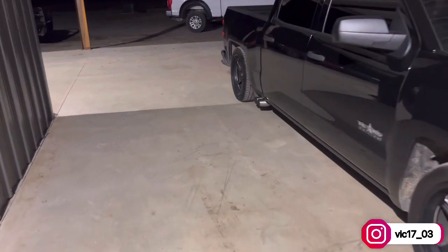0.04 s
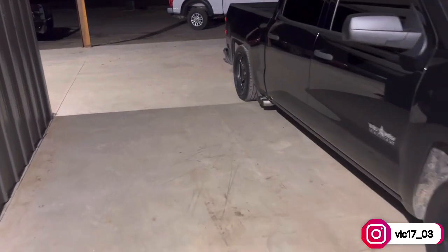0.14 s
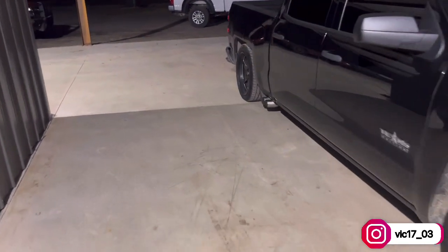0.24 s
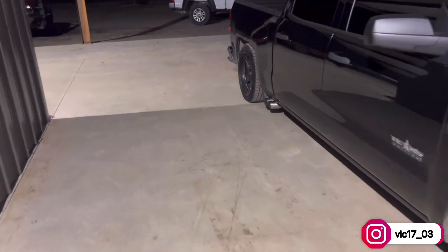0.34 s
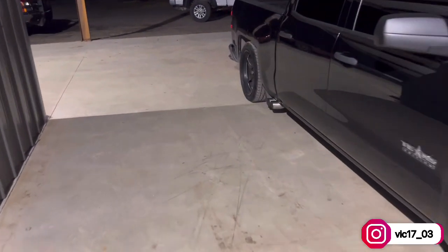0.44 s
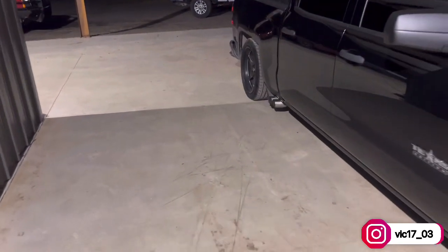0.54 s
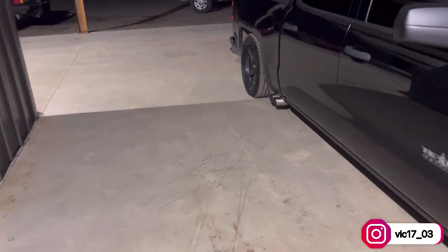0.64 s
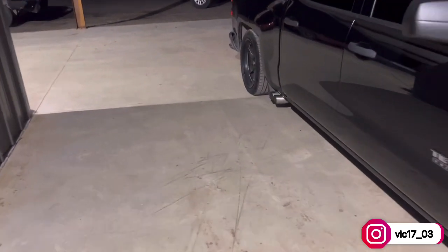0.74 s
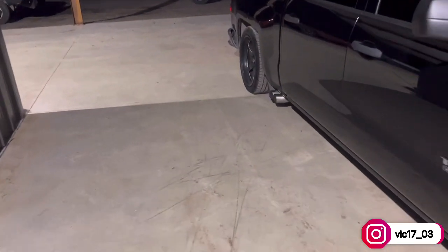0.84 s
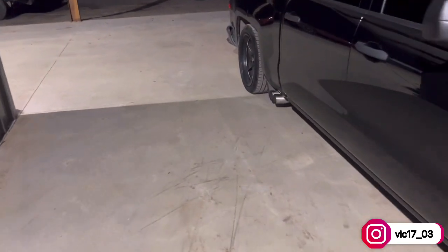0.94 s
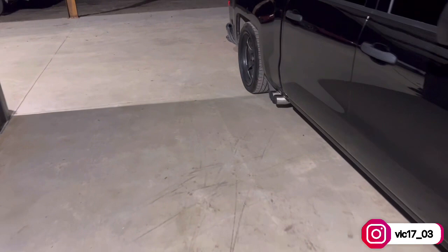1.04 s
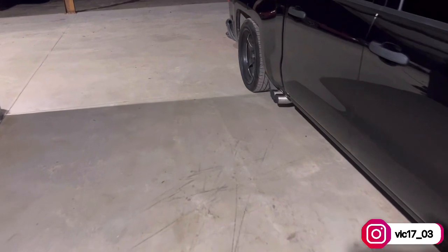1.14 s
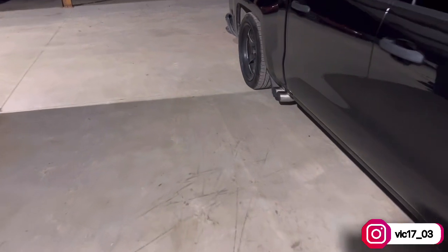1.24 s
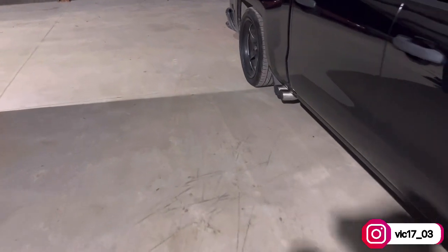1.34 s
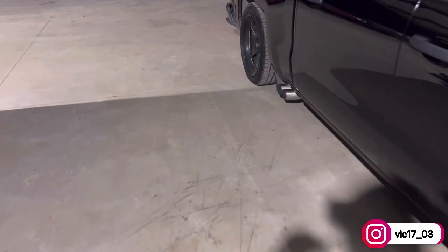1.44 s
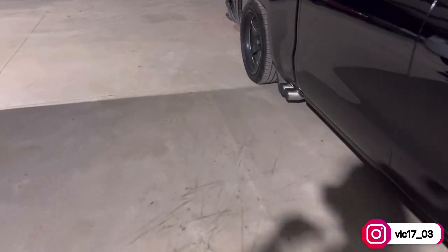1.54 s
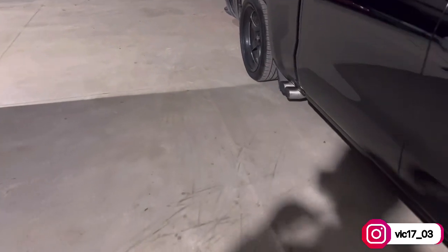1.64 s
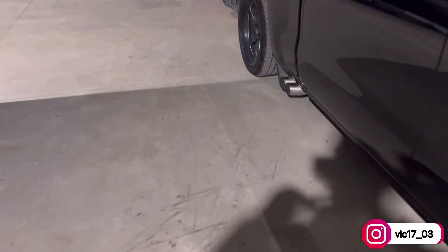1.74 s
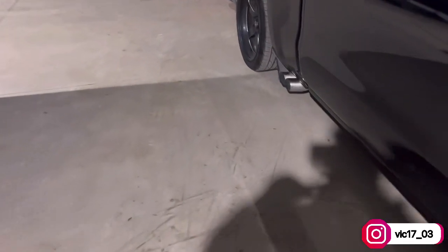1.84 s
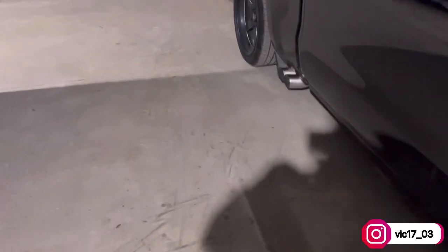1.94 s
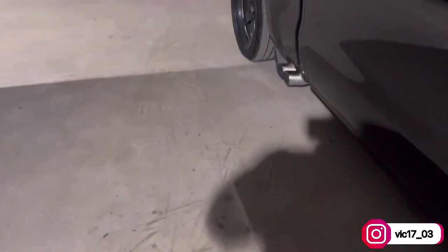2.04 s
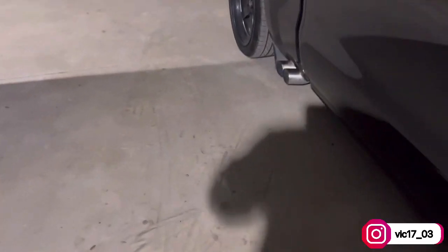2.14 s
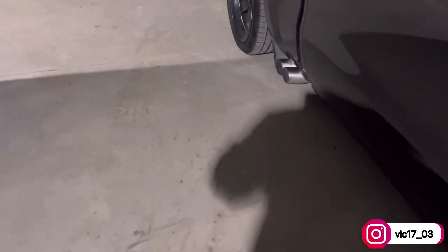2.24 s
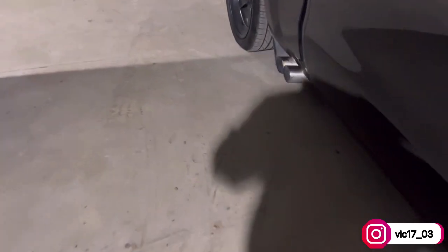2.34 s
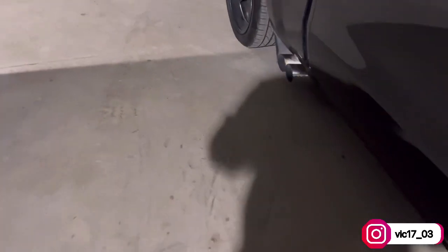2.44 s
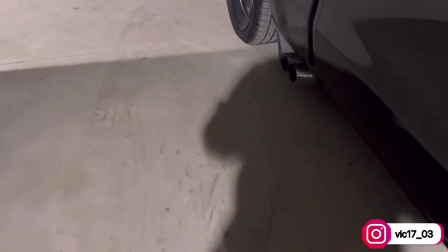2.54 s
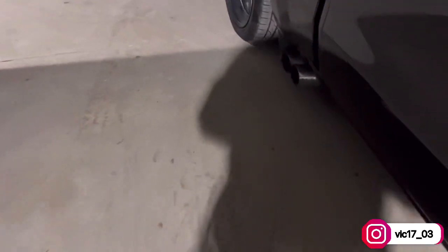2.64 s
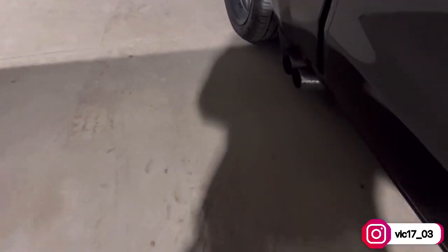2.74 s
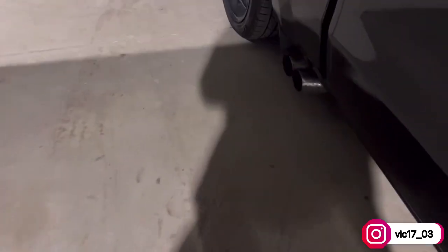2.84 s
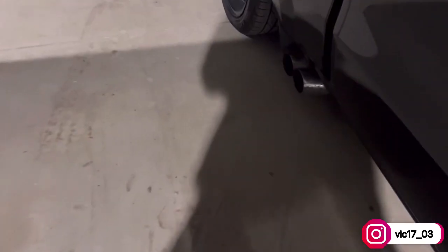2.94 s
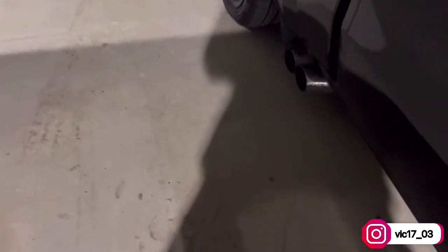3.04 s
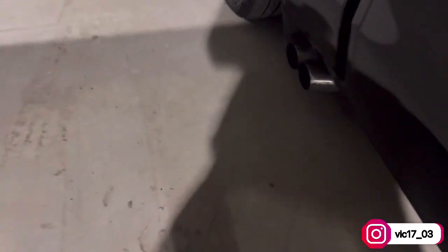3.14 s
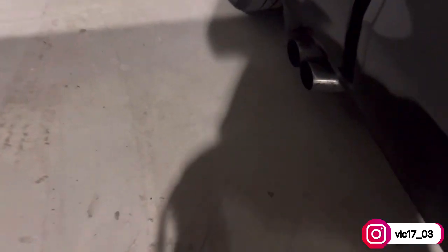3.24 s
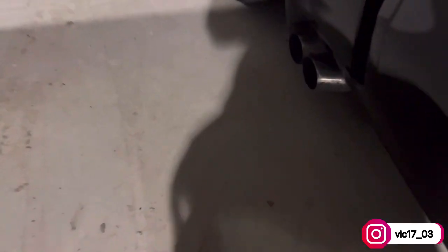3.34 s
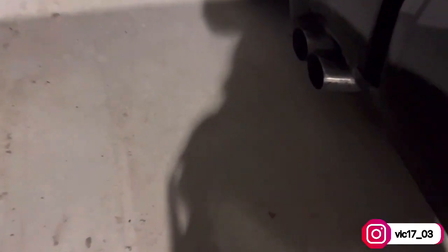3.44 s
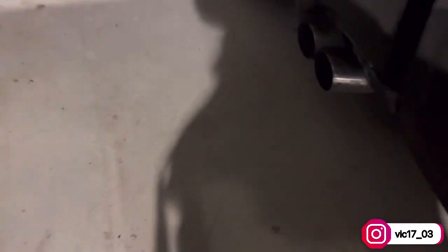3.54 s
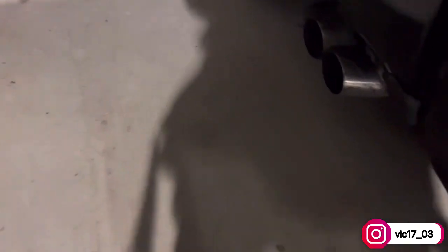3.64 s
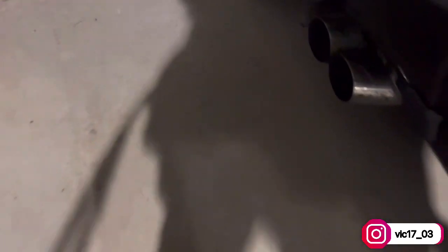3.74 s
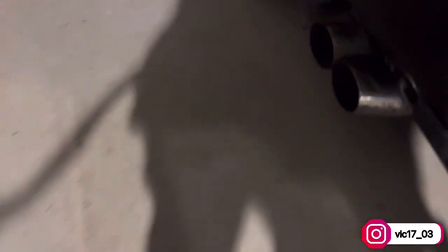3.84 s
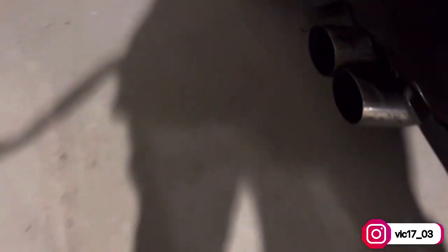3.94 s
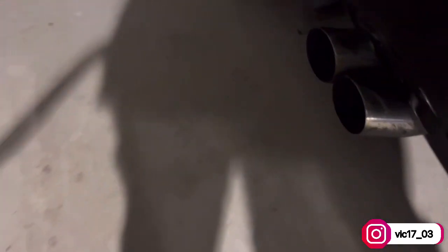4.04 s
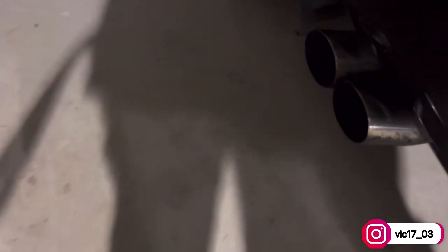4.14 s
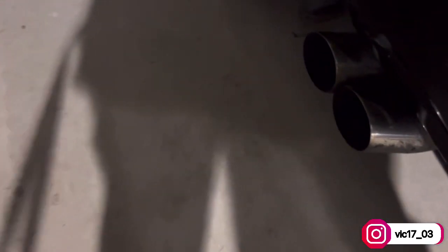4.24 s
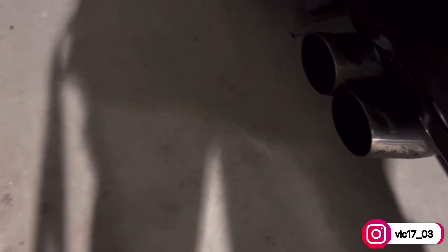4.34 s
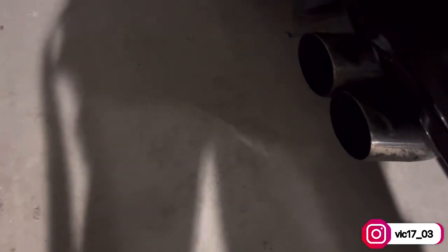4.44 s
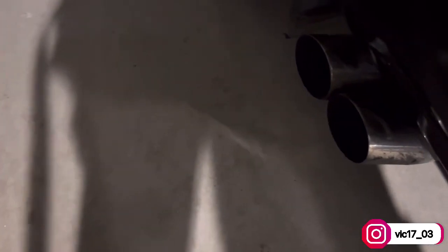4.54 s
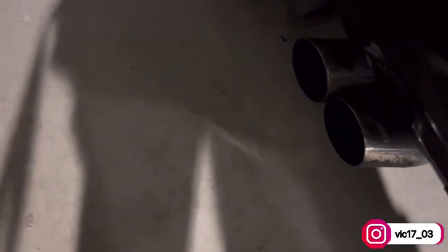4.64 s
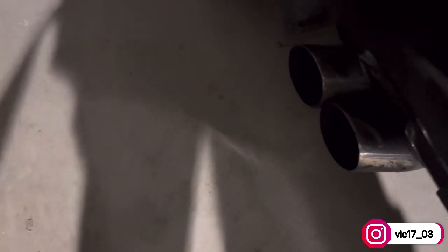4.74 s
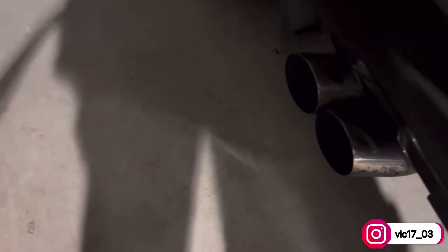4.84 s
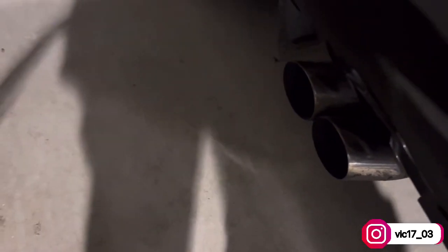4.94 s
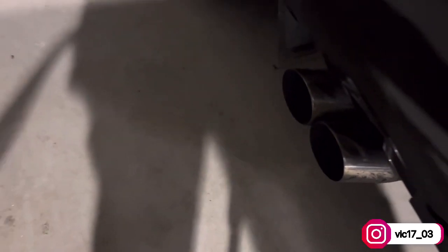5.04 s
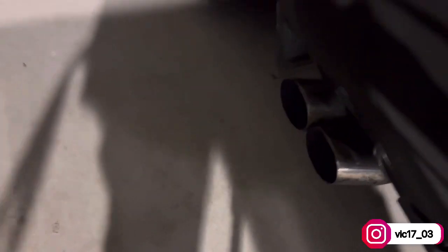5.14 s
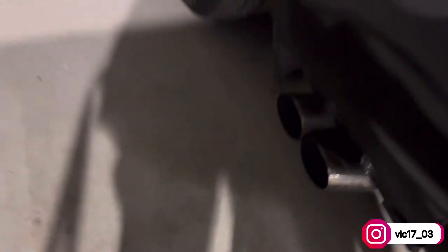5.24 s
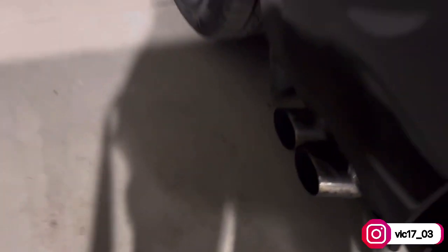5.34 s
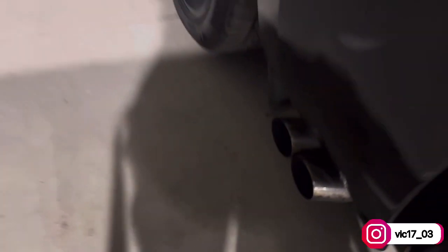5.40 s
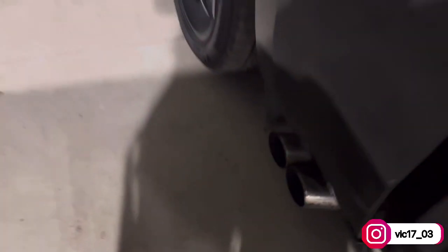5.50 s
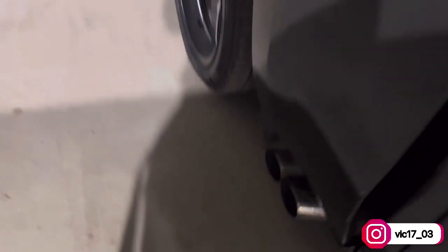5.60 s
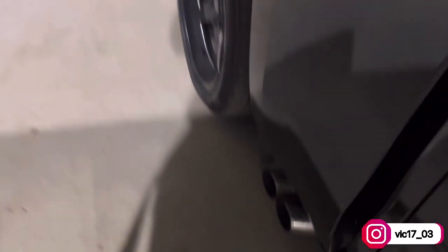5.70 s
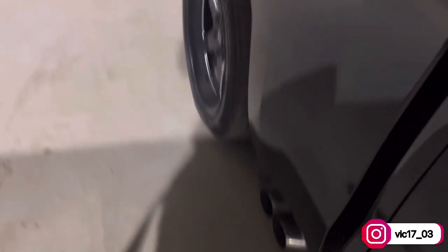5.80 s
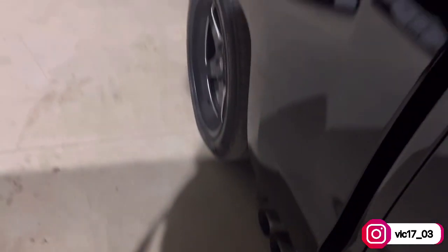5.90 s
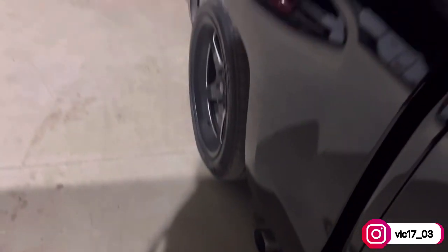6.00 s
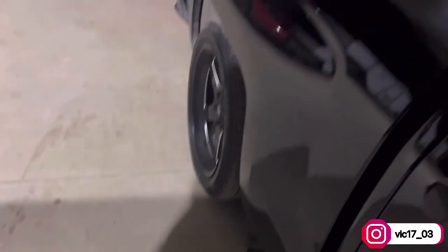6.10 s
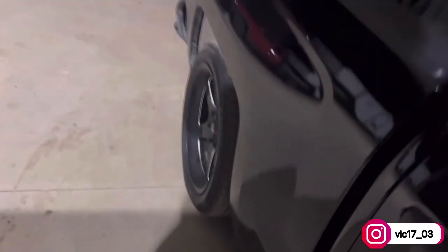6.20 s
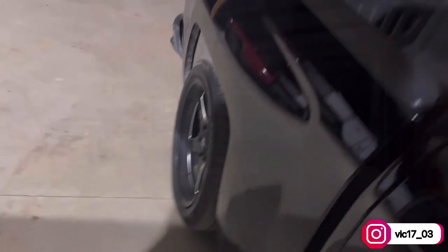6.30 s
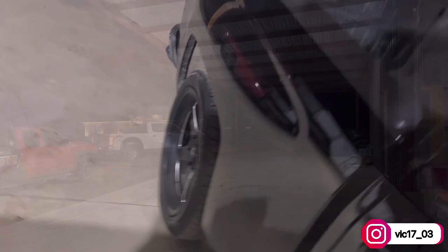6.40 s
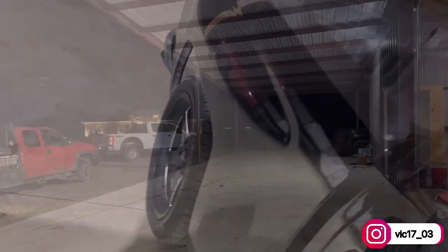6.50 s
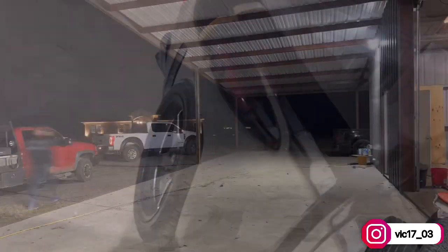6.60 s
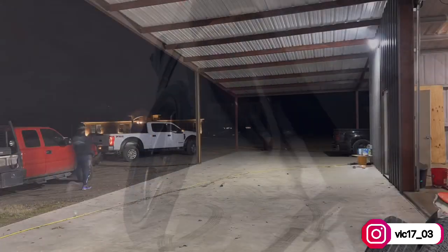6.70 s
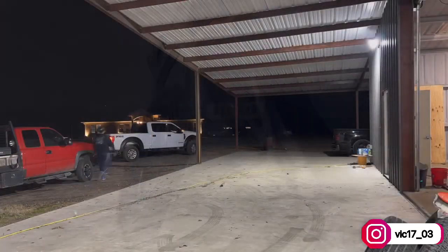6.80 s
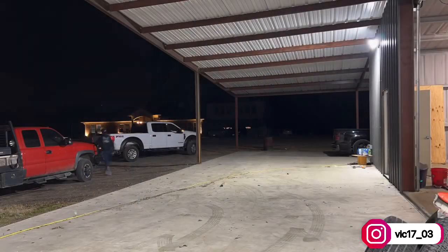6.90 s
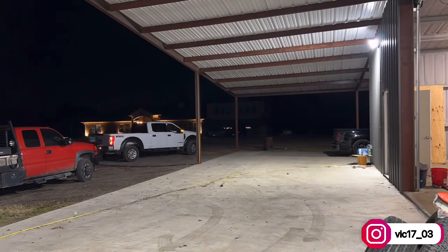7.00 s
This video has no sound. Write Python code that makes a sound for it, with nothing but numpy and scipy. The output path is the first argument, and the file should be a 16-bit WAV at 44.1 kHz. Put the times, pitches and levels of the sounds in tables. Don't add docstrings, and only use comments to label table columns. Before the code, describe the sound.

A V8 pickup with open side pipes idles in a deep, uneven lope under a metal carport, growing hissier and raspier close to the tips.

```python
import sys
import numpy as np
from scipy import signal
from scipy.fft import rfft, irfft, next_fast_len
from scipy.io import wavfile
from scipy.ndimage import uniform_filter1d, minimum_filter1d

SR = 44100
rng = np.random.default_rng(int(sys.argv[2]) if len(sys.argv) > 2 else 0)


def bounce(signal):
    frames = np.transpose(np.atleast_2d(signal))
    limited = np.clip(frames, -1, 1)
    pcm = np.round(limited * 32767).astype(np.int16)
    wavfile.write(sys.argv[1], SR, pcm)


def how_loud(loudness_db):
    steps = np.asarray(loudness_db, float) / 20
    return 10 ** steps


N = 311346


def unit(x):
    return x / np.sqrt(np.mean(x ** 2) + 1e-20)


def along(points, hz):
    f, value = np.transpose(points)
    return np.interp(np.log(hz + 1), np.log(f + 1), value)


def curve(rows):
    return np.interp(np.arange(N) / SR, *np.transpose(rows))


def filtered(x, response):
    m = next_fast_len(N + SR // 2)
    spectrum = rfft(x, m) * response(np.fft.rfftfreq(m, 1 / SR))
    return irfft(spectrum, m)[..., :N]


def levelled(x, seconds):
    power = uniform_filter1d(np.mean(x.reshape(-1, N) ** 2, 0), int(seconds * SR))
    return x / np.sqrt(np.abs(power) + 1e-12)


def patches(db, wide, long):
    z = signal.stft(rng.standard_normal((2, N)), nperseg=512)[2]
    field = uniform_filter1d(rng.standard_normal(z.shape[1:]), int(wide), 0)
    field = uniform_filter1d(field, int(long), 1)
    return signal.istft(z * how_loud(db * unit(field)), nperseg=512)[1][:, :N]


# (frequency [Hz], correlation [0-1])
ALIKE = [(60, 1), (250, .95), (500, .78), (1000, .84), (2000, .82), (4000, .8), (8000, .87), (12000, .92)]
# (frequency [Hz], width [Hz], level [dB])
PANELS = [(62.4, 37, 13), (197, 3.4, -8.5), (284.5, 7.2, 10.5), (313, 4.5, 5), (360, 20, 8.5),
          (392, 60, 6.5), (486.6, 33, 7.5), (767, 66, 5), (944, 50, 5), (1090, 9.9, 6), (1620, 24, 4.5),
          (1800, 73, 4.5), (2620, 42, 3.5), (3800, 42, 6), (4230, 70, 2.5), (4760, 14, -5.5),
          (6840, 120, 1.5), (7700, 1300, 4), (8400, 870, 2.5)]


def rush(spectrum, gas, comb=lambda hz: 1):
    f = np.arange(SR // 2 + 1.)
    turn = np.arccos(np.clip(along(ALIKE, f), -1, 1)) / 2
    ring = 1
    for hz, width, db in PANELS:
        ring = ring + (how_loud(db) - 1) * 1j * f * width / (hz * hz - f * f + 1j * f * width)
    colour = how_loud(along(spectrum, f)) * comb(f) * ring * [np.cos(turn), np.sin(turn)]
    mid, side = filtered(gas, lambda hz: np.array([np.interp(hz, f, c) for c in colour]))
    return unit(np.array([mid + side, mid - side]))


# (time [s], crank speed [rpm])
SPEED = [(0, 751.02), (1.2596, 747.21), (1.6096, 733.49), (2.5658, 746.5), (3.7472, 744.68),
         (4.5081, 723.71), (5.5131, 751.21), (6.2453, 732.38), (7.2, 732.92)]


def cycles():
    rate, first_cycle_s = 2000, .0027
    t = np.arange(0, SPEED[-1][0], 1 / rate)
    turn = np.cumsum(np.interp(t, *np.transpose(SPEED))) / rate / 120
    turn = turn - first_cycle_s * SPEED[0][1] / 120
    return np.interp(np.arange(int(turn[-1]) + 1), turn, t + 1 / rate)


# (crank position [eighths of a cycle], pulse level [dB])
CYLINDERS = [
    (0.247, 13.9),
    (1.199, 10.6),
    (2.382, 3.5),
    (3.256, 1.5),
    (4.246, 2.1),
    (5.257, 5.4),
    (6.258, 9.5),
    (7.241, 7.2),
]
BANK = [0, 1, 2, 0, 1, 0, 0, 1]


def firings(late, jitter_s, scatter_db):
    starts = cycles()
    starts = np.r_[3 * starts[0] - 2 * starts[1], 2 * starts[0] - starts[1], starts]
    turn = np.arange(len(starts) - 1)[:, None] + (np.transpose(CYLINDERS)[0] + late) / len(BANK)
    luck = rng.standard_normal((turn.size, 2))
    s = np.interp(turn.ravel(), np.arange(len(starts)), starts, left=-1) + jitter_s * luck[:, 0]
    cylinder = np.arange(turn.size) % len(BANK)
    return np.round(s * SR).astype(int), cylinder, how_loud(scatter_db * luck[:, 1])


def impulses(at, strength):
    inside = (at >= 0) & (at < N)
    return np.bincount(at[inside], strength[inside], N)


# (frequency [Hz], density [dB per Hz])
BAY = [(420, -39.5), (540, -8), (620, -3.5), (700, 0.5), (900, -42.5)]


def bay():
    level_db, fade_db_per_s = -51.5, 2.5
    fade = how_loud(level_db - fade_db_per_s * np.arange(N) / SR)
    return fade * rush([(200, -120), *BAY, (2000, -120)], patches(2.1, 1.7, 5.8))


def echoes(still, uneven):
    at, cylinder, luck = firings(0, jitter_s=.0001, scatter_db=1)
    pulses = impulses(at, luck * how_loud(np.transpose(CYLINDERS)[1] * uneven)[cylinder])
    bins, kept = 4097, 600
    z = signal.stft(pulses, nperseg=8192, noverlap=6144)[2][:kept]
    paths = uniform_filter1d(rng.standard_normal((2, 2, *z.shape)), size=4, axis=2)
    paths = uniform_filter1d(paths, still, 3)
    z = np.pad(z * (paths[0] + 1j * paths[1]), ((0, 0), (0, bins - len(z)), (0, 0)))
    return unit(signal.istft(z, nperseg=8192, noverlap=6144)[1][:, :N]) * np.sqrt(kept / bins)


# (time [s], level [dB])
SPIT = [(0, -73.5), (2.4, -63.5), (4.2, -59.5), (6.1, -68.5), (6.5, -89.5), (7.06, -85)]


def ticks():
    ring_hz, t60_s, rise_s = 4750, .02, .0015
    at, cylinder, luck = firings(-.2, jitter_s=.0008, scatter_db=4.5)
    t = np.arange(SR // 25) / SR
    partials = np.sin(2 * np.pi * ring_hz * t) + 2.0 * np.sin(2 * np.pi * .87 * ring_hz * t)
    ping = how_loud(-60 * t / t60_s) * (1 - np.exp(-t / rise_s)) * partials
    return how_loud(curve(SPIT)) * unit(signal.fftconvolve(impulses(at, luck), ping)[:N])


def struck(rows, t60_s, rise_s, ring_db, crack_db, low_hz, high_hz):
    out, t = np.zeros((2, N + SR)), np.arange(SR // 20) / SR
    shape = how_loud(-60 * t / t60_s) * (1 - np.exp(-t / rise_s))
    shape = shape / shape.max()
    for s, db, hz in rows:
        noise = rng.standard_normal((3, len(t)))
        burst = how_loud(crack_db) * (noise[0] + .3 * noise[1:])
        ring = how_loud(ring_db) * np.sin(2 * np.pi * hz * t)
        out[:, round(s * SR):][:, :len(t)] += how_loud(db) * shape * (ring + burst)
    return filtered(out[:, :N], lambda f: 1 / (1 + (low_hz / (f + 1)) ** 6) / (1 + (f / high_hz) ** 30))


# (time [s], peak level [dB], ring frequency [Hz])
SPITS = [(0.165, -39, 4070), (1.4521, -36, 3640), (1.899, -44, 3700), (2.0794, -37, 4600),
         (2.582, -34, 4190), (3.4322, -30, 3930), (3.534, -25, 3900), (3.5683, -27, 4280),
         (3.6326, -31, 3830), (3.8118, -41, 3690), (3.8305, -38, 3680), (3.9744, -35, 4760),
         (4.0532, -29, 3970), (4.138, -30, 4740), (4.1769, -37, 4010), (4.1969, -26, 4800),
         (4.2582, -25, 3900), (4.3198, -38, 3430), (4.3415, -36, 4150), (4.3814, -32, 4630),
         (4.4039, -26, 3740), (4.4468, -34, 4600), (4.5062, -37, 4250), (4.5262, -26, 4200),
         (4.5466, -37, 3600), (4.6488, -35, 4700), (4.691, -32, 4270), (4.733, -33, 4960),
         (4.7975, -36, 4230), (4.814, -43, 4870), (4.939, -43, 3330), (4.9991, -39, 4000),
         (5.0603, -43, 4470), (5.1402, -40, 4540), (5.1627, -41, 4220), (5.2016, -38, 4230),
         (5.3009, -34, 4570), (5.6211, -43, 4650), (5.6816, -33, 4700), (5.8661, -34, 4800),
         (5.9434, -34, 4640)]


def spits():
    return struck(SPITS, t60_s=0.017, rise_s=0.001, ring_db=-11, crack_db=-9, low_hz=3200, high_hz=5200)


# (time [s], peak level [dB], ring frequency [Hz])
POPS = [(0.517, -29, 910), (1.151, -29, 860), (1.37, -24, 784), (1.47, -27, 800), (1.631, -22, 766),
        (2.766, -26.5, 840), (3.206, -34, 810), (3.387, -35, 770), (3.629, -37, 1070), (3.658, -35, 990),
        (4.012, -39, 1130), (4.033, -17, 746), (4.176, -18, 1140), (4.211, -33, 1173), (4.291, -17, 975),
        (4.578, -15, 950), (4.643, -20.5, 980), (4.69, -21, 950), (4.728, -27.5, 773), (4.77, -16, 853),
        (4.912, -31, 1050), (5.095, -22, 860), (5.201, -31.5, 790), (5.611, -22.5, 970), (6.199, -30, 780)]


def pops():
    return struck(POPS, t60_s=0.072, rise_s=0.0016, ring_db=-8.0, crack_db=-5.0, low_hz=704, high_hz=1800)


# (time [s], jet level [dB], boom level [dB])
ODD_CYCLES = [(.02, -4, -2.5), (0.339, -2, 0.5), (.96, 2, 0.5), (1.14, -2.5, -2), (1.45, -1, 0.5),
              (1.643, 5, -1.5), (1.797, -5, 0), (1.948, 2, -1), (2.09, 1, -0.5), (2.44, -1.5, -2),
              (2.6, 1, -1.5), (2.772, 3.5, -1), (2.92, -1, -1), (3.09, 0.5, -1), (3.49, -4, 3),
              (3.55, -1, 0.5), (4.04, 4.5, -1), (4.7, 2.5, 1), (5.041, 2.5, -1.5), (5.37, 2.5, -1.5),
              (5.5, -6, 0), (5.688, 5, 0), (6.15, 3, 1.5), (6.959, 4.5, -2)]


def chuffs():
    depth_db, place, half_width_s = 3.8, .1, .033
    t, starts = np.arange(N) / SR, cycles()
    turn = np.interp(t, starts, np.arange(len(starts)))
    s, jet_db, boom_db = np.transpose(ODD_CYCLES)
    coarse = t[::64]
    bumps = np.exp(-.5 * ((coarse - s[:, None]) / half_width_s) ** 2)
    odd_jet, odd_boom = [np.interp(t, coarse, db @ bumps) for db in (jet_db, boom_db)]
    return depth_db * np.cos(2 * np.pi * (turn - place)) + odd_jet, odd_boom


PUFF_DB = [-9, -9.5, -10, -11, -10, -10.5, -7.5, -11]
# (time [s], nearness [0-1])
NEAR = [
    (0, .12),
    (2.5, .2),
    (3.5, .4),
    (4.2, .65),
    (5.2, .55),
    (5.9, .3),
    (7.06, .3),
]


def puffs(rise_s, fall_s, depth, scatter_db):
    at, cylinder, luck = firings(-.2, jitter_s=.0008, scatter_db=scatter_db)
    blows = impulses(at, luck * how_loud(np.array(PUFF_DB))[cylinder])
    t = np.arange(SR // 8) / SR
    sharp = signal.fftconvolve(blows, np.exp(-t / fall_s) * (1 - np.exp(-t / rise_s)))[:N]
    bed = unit(signal.fftconvolve(blows, np.exp(-t / 0.15))[:N] + 400)
    return bed + depth * curve(NEAR) * np.abs(sharp)


# (time [s], level [dB])
JET = [(0, -50.5), (1.3, -49), (2.3, -51.5), (3.3, -50), (4, -47.5), (4.7, -46), (5.3, -50), (5.8, -54),
       (6.4, -56), (7.06, -58)]
# (time [s], share [0-1])
FACING = [
    (0, 0.41),
    (2.8, 0.09),
    (3.8, 0.6),
    (5.5, 0.87),
    (7.06, 0.8),
]
# (frequency [Hz], density [dB per Hz])
HISS = [(1350, -25), (2300, 0), (2720, -16.5), (2850, -15.5), (3390, -12.5), (3920, -12.5), (4460, -8),
        (4810, -7), (5430, -18.5), (6100, -16.5), (6770, -12), (7430, -14.5), (8060, -10), (9210, -13),
        (12000, -51.5), (20300, -120)]
# (frequency [Hz], density [dB per Hz])
HISS_FAR = [(1350, -18.5), (2300, -5), (3000, -1), (3470, -3), (4180, -4.5), (5660, -9.5), (7340, -7),
            (8200, -5.5), (8690, -4), (9210, -6), (12000, -37.5), (20300, -120)]
# (frequency [Hz], density [dB per Hz])
AIR = [(10900, -120), (11200, -5.5), (11800, -4.5), (13600, -2.5), (15000, -0.5), (15600, -14.5),
       (15800, -120)]


def jet():
    chuff_low = .6
    air_db, air_per_jet = -71.5, 0.86
    chuff_db = chuffs()[0]
    jet_db, near = curve(JET), np.clip(curve(FACING), 0, 1)
    gas = puffs(0.00031, 0.0041, depth=7.5, scatter_db=2.5) * patches(2.2, 5.3, 3)
    hiss = near * rush(HISS, gas) + (1 - near) * rush(HISS_FAR, gas)
    hiss = filtered(hiss, lambda hz: 1 / (1 + (hz / 9600) ** 80))
    hiss, air = levelled(hiss, .18), levelled(rush(AIR, gas), .2)
    top = filtered(hiss, lambda hz: 1 / (1 + (5600 / (hz + 1)) ** 8))
    hiss = hiss + (how_loud((0.5 - chuff_low) * chuff_db) - 1) * top
    air_level = how_loud(air_db + air_per_jet * (jet_db - jet_db.mean()) + chuff_db)
    return how_loud(jet_db + chuff_low * chuff_db) * hiss + air_level * air


# (time [s], pipe level [dB])
WALK = [(0, -13.5), (.5, -14.5), (1.2, -11.5), (2, -11), (2.9, -11.5), (3.5, -10.5), (4, -7.5), (4.6, -7),
        (5.3, -9), (5.8, -13.5), (6.3, -15.5), (7.06, -14.5)]
# (frequency [Hz], density [dB per Hz])
ROAR = [(350, -47), (600, -17), (751, 1.5), (952, -7), (1210, -2.5), (1340, -7.5), (1580, -10),
        (1970, -28.5), (2900, -27.5), (3770, -47), (6380, -120)]
# (frequency [Hz], density [dB per Hz])
ROAR_FAR = [(250, -36), (430, -5), (489, 1), (573, -12), (641, -24.5), (689, -11.5), (802, -2), (882, -7.5),
            (1100, -11.5), (1300, -20.5), (1420, -10.5), (1800, -26.5), (2010, -13), (2320, -25),
            (2900, -24), (3770, -57), (6380, -120)]
# (time [s], level [dB])
SILL = [
    (0, -20.5),
    (1.7, -25.5),
    (2.2, -3.5),
    (3.5, 0.5),
    (4, -1.5),
    (7.06, -38),
]


def roar():
    under_boom_db, near_db, per_jet, per_chuff = -26, -1.5, .3, .3
    jet_db, near = curve(JET), np.clip(curve(FACING), 0, 1)
    level_db = curve(WALK) + under_boom_db + near_db * curve(NEAR)
    level_db = level_db + per_jet * (jet_db - jet_db.mean()) + per_chuff * chuffs()[0]
    gas = unit(patches(3.0, 3.6, 3)) + 0.87 * echoes(6, uneven=0.05)
    gas = puffs(0.001, 0.005, depth=3.2, scatter_db=1.0) * gas
    comb = lambda hz: np.abs(1 - 0.47 * np.exp(-2j * np.pi * hz / 672))
    heard = near * rush(ROAR, gas, comb) + (1 - near) * rush(ROAR_FAR, gas)
    upper = filtered(heard, lambda hz: 1 / (1 + ((hz - 1750) / 480) ** 4))
    return how_loud(level_db) * (heard + how_loud(curve(SILL)) * upper)


# (time [s], level under the boom [dB])
CLIMB = [(0, -21), (1.3, -27.5), (2.2, -31), (2.9, -24), (3.6, -17), (4.3, -13.5), (5.1, -16.5), (5.8, -18),
         (7.06, -20.5)]


def tones():
    starts = cycles()
    turn = np.interp(np.arange(N) / SR, starts, np.arange(len(starts)))
    reach = np.clip(4 * curve(NEAR) - 1.3, 0, 1)
    way = np.clip((turn % 1 - .15) / (.33 + .34 * reach), 0, 1)
    luck = rng.standard_normal((len(starts), 2))[turn.astype(int)]
    hz = (225 + (65 + 37 * reach) * np.sin(way * np.pi / 2)) * (1 + .012 * luck[:, 0])
    turns = np.cumsum(hz) / SR
    turns = turns - np.maximum.accumulate(turns * (way == 0))
    climb = np.sqrt(np.abs(np.sin(np.pi * way))) * np.sin(2 * np.pi * turns)
    shake = np.sin(2 * np.pi * turn * 5)
    return how_loud(curve(CLIMB) + 1.2 * luck[:, 1]) * climb + how_loud(-31.0) * shake


# (frequency [Hz], width [Hz], signed strength at 8 places)
PIPE_A = [(56.3, 9.9, -1.2, -1.3, -0.8, -1.9, -1.4, -4.6, -1.6, -1.9),
          (64.1, 8.1, 1.9, 5.4, 3.7, 6.8, 9.3, 14.3, 9.8, 8.4),
          (77.5, 30.3, -0.5, -2.4, -2.3, -3.9, -5.4, -7.8, -5.6, -5.6),
          (91.6, 8.6, 0.7, 4.8, 1.4, 4.3, 10.6, 8.6, 10.1, 5.8),
          (119.9, 30.9, 3.7, 2.9, 1.1, 3.4, 3.7, 2.6, 2.4, 3.9),
          (128.9, 4.9, -15.0, -6.5, 0.7, -1.6, -4.8, -0.0, -1.9, -3.0),
          (176.0, 17.4, -0.4, 0.5, -1.3, -3.3, -0.9, -3.4, -1.4, -2.5),
          (170.2, 4.0, -1.7, 4.8, 6.7, 9.6, 3.2, 12.7, 6.5, 8.5),
          (205.0, 4.8, -0.9, 5.8, 8.2, 4.6, 5.9, 4.0, 6.1, 5.0),
          (232.8, 12.3, -2.8, -5.9, -5.0, 0.4, -1.1, 0.4, -0.6, -1.0),
          (244.3, 5.7, 3.0, 1.7, 2.5, -0.6, -1.7, 0.4, -0.5, -0.6),
          (288.0, 4.5, -0.3, -2.1, 0.1, -1.2, -0.7, 0.4, -0.5, -0.4),
          (315.4, 4.0, 0.0, 0.3, 0.3, -0.4, -1.1, 0.0, -0.8, -0.3),
          (355.7, 10.5, 0.1, 0.1, 0.0, 0.2, 0.2, 0.2, 0.2, 0.3)]
# (frequency [Hz], width [Hz], signed strength at 8 places)
PIPE_B = [(56.6, 12.1, 5.7, 5.6, 3.2, 5.3, 6.3, 9.1, 7.0, 4.9),
          (62.7, 4.2, -7.5, -5.8, -0.2, -0.3, -3.7, 6.1, -0.9, 3.0),
          (76.2, 34.4, -0.5, -2.5, -2.3, -3.7, -4.8, -7.1, -5.3, -5.3),
          (106.0, 8.7, -1.4, 1.2, 0.7, 3.7, 7.6, 7.0, 9.5, 2.8),
          (111.3, 4.0, 8.8, 8.5, 2.4, 6.2, 11.8, 6.6, 7.2, 10.8),
          (122.5, 6.0, -10.7, -2.8, 1.1, -3.3, -7.1, -4.1, -7.4, -3.1),
          (151.7, 6.5, -2.0, -0.9, 2.6, 7.0, 3.8, 3.2, 4.8, 2.3),
          (165.3, 8.4, -0.1, 6.4, 4.4, 3.1, 4.5, 4.6, 5.1, 5.0),
          (201.5, 4.0, 1.6, -7.1, -6.1, -6.5, -4.6, -7.9, -6.3, -6.8),
          (225.4, 7.2, -2.7, -4.8, 5.2, 0.5, 0.3, -2.6, -0.3, -4.1),
          (233.5, 13.1, 1.2, 2.9, -1.2, -1.2, 0.2, -0.1, -1.0, 2.9),
          (281.4, 7.7, 0.9, 0.6, -0.1, -1.0, -1.1, -1.8, -1.5, -0.9),
          (293.4, 4.7, -1.1, -0.6, 0.2, 0.5, 0.8, 0.7, 1.1, 0.3),
          (320.9, 69.7, -0.0, -0.2, 0.1, 0.2, 0.2, 0.1, 0.3, 0.2)]
# (frequency [Hz], width [Hz], signed strength at 8 places)
PIPE_C = [(61.2, 7.0, -13.0, -7.9, -1.6, -3.1, -9.1, -0.3, -5.7, -1.3),
          (75.0, 10.0, 1.6, 2.8, 1.5, -3.6, -1.3, -1.8, -1.1, -1.5),
          (96.9, 4.0, 1.6, 20.0, 3.3, -1.3, -0.7, -21.4, -7.6, -10.6),
          (116.5, 22.5, 4.6, 0.1, -2.8, 6.0, 7.6, 13.3, 9.4, 7.1),
          (125.4, 4.9, -4.6, 4.3, -5.1, -29.3, -21.7, -30.0, -26.4, -17.0),
          (141.2, 22.5, -6.6, -0.7, 4.9, 2.6, 1.6, 1.8, 3.0, -1.0),
          (173.4, 4.0, 6.1, 4.3, -8.3, -0.6, 7.4, 3.0, 1.0, 9.3),
          (203.0, 4.0, 7.4, -12.6, 14.9, 8.1, -11.9, 1.9, -0.6, -5.8),
          (228.0, 4.9, 3.3, 8.7, -12.5, -1.7, 0.5, -1.1, 0.4, -5.6),
          (240.1, 7.0, 7.7, 8.0, 1.3, -3.5, -2.4, -0.3, -1.7, 1.9),
          (275.0, 10.0, 1.7, 7.4, -2.6, 5.2, 0.3, -3.5, -0.4, 1.4),
          (282.4, 10.0, -0.3, -6.3, 0.4, -0.1, -1.3, 2.3, 1.0, 1.1),
          (318.5, 7.0, -0.2, -3.1, 1.6, -0.5, -0.0, 2.2, 0.2, 0.6),
          (350.0, 10.0, 0.0, 0.9, -0.3, 1.1, -0.6, 1.2, -0.3, -0.1)]
# (time [s], listening place [number])
PLACES = [
    (.3, 0),
    (1, 1),
    (1.7, 2),
    (2.4, 3),
    (3.2, 4),
    (4.3, 5),
    (5.3, 6),
    (6.4, 7),
]
# (frequency [Hz], level [dB])
SHELL = [(40, 7), (50, 4), (63, 9), (80, 3.5), (125, 4), (140, 8.5), (185, 1), (215, 5.5), (320, 1.5)]
# (time [s], level against the usual pulse [dB])
STUMBLES = [(0.008, -3.2), (0.228, -26.0), (0.307, -26.0), (0.327, 1.1), (0.388, -26.0), (0.448, -6.2),
            (0.487, 2.5), (0.506, 3.0), (0.666, 2.8), (0.788, -26.0), (1.148, 2.8), (1.411, 3.3),
            (1.633, 3.1), (1.716, -26.0), (1.736, -5.4), (1.777, -5.4), (1.838, -26.0), (1.899, 3.7),
            (2.062, 2.2), (2.526, -10.3), (2.566, 1.8), (3.351, 1.8), (3.673, 2.1), (3.894, 1.9),
            (3.997, 2.2), (4.016, 2.2), (4.695, -3.2), (4.715, -5.5), (5.144, 2.1), (5.486, -4.9),
            (5.807, -6.6), (5.949, 3.9), (5.969, 2.5), (6.171, -1.6), (6.295, -6.7), (6.316, 1.3),
            (6.335, 2.0), (6.459, 2.5), (6.48, -2.2), (6.499, -3.0)]


def boom():
    at, cylinder, luck = firings(0, jitter_s=.0001, scatter_db=.7)
    s, db = np.transpose(STUMBLES)
    luck = luck * how_loud(db @ (np.abs(at - s[:, None] * SR) < SR // 200))
    lead = SR // 2
    size = luck * how_loud(np.transpose(CYLINDERS)[1])[cylinder] * (at > -lead)
    m = next_fast_len(N + 2 * SR)
    f = np.fft.rfftfreq(m, 1 / SR)[:m * 900 // SR]
    heard = 0
    for bank, pipe in enumerate((PIPE_A, PIPE_B, PIPE_C)):
        fed = size * (np.take(BANK, cylinder) == bank)
        pulses = np.bincount(np.clip(at + lead, 0, m - 1), fed, m)
        hz, width = np.transpose(pipe)[:2, :, None]
        modes = 1j * f * width / (hz ** 2 - f ** 2 + 1j * f * width)
        heard = heard + rfft(pulses)[:len(f)] * (np.transpose(pipe)[2:] @ modes)
    band = 1 / (1 + (f / 450) ** 12) / (1 + (40 / (f + 1)) ** 8)
    share = np.clip(1 - np.abs(curve(PLACES) - np.arange(len(heard))[:, None]), 0, 1)
    rung = irfft(heard * band * how_loud(along(SHELL, f)), m)[:, lead:lead + N]
    return levelled(np.sum(share * rung, 0), .49)


def squeezed(x):
    window, share = int(.012 * SR), .08
    power = uniform_filter1d(uniform_filter1d(x ** 2, window), window)
    return unit(x * (np.abs(power) + 0.079) ** (-share / 2))


def walled(x):
    wall_db, fade_db_per_s, wall_hz = -3.5, 0.15, 85
    lift = how_loud(wall_db - fade_db_per_s * np.arange(N) / SR) - 1
    return x + lift * filtered(x, lambda hz: 1 / (1 + (hz / wall_hz) ** 6))


# (frequency [Hz], density [dB per Hz])
RUMBLE = [(13, -48.5), (22, -33), (113, -21), (171, 5), (216, -0.5), (238, 3.5), (287, -5), (383, -11.5),
          (448, -28.5), (503, -20), (572, -41.5), (633, -47), (680, -21.5), (880, -76.5), (1500, -120)]
# (time [s], level under the boom [dB])
ROOM = [(0, -17), (2, -16), (3.5, -14), (4.5, -19), (5.5, -15.5), (7.06, -13.5)]


def exhaust():
    rumble = rush(RUMBLE, echoes(16, uneven=.5))
    low = how_loud(-.5) * walled(squeezed(boom())) + how_loud(curve(ROOM)) * rumble + tones()
    return how_loud(curve(WALK) + chuffs()[1]) * low + roar() + jet()


# (time [s], left minus right [dB])
SWAY = [(0, 0.3), (1, 0.5), (2, -0.4), (3.5, 0.2), (4.2, -0.5), (5.5, 0), (7.06, -0.3)]
# (frequency [Hz], left minus right [dB])
LEAN = [(30, .7), (125, .3), (300, .2), (600, -1.7), (1200, -1), (2200, .7), (8000, .7), (12000, 0)]
# (frequency [Hz], left lead [rad])
LEAD = [(30, -0.026), (250, -0.39), (780, 0.87), (1460, -0.94), (2930, .8), (5000, 0.72), (7300, -0.21),
        (9000, 2.47), (11000, 1.1)]


def scene():
    side = np.array([[.5], [-.5]])
    heard = bay() + ticks() + spits() + pops() + exhaust()
    heard = heard * how_loud(side * curve(SWAY))
    return filtered(heard, lambda hz: how_loud(side * along(LEAN, hz)) * np.exp(1j * side * along(LEAD, hz)))


def band_limit(x):
    return signal.sosfilt(signal.butter(12, 15700, fs=SR, output="sos"), x)


def record(dry):
    need = np.minimum(1, .92 / (np.abs(dry).max(0) + 1e-9))
    gain = uniform_filter1d(minimum_filter1d(need, size=1400), size=700)
    return band_limit(dry * gain)


dry = scene()
out = record(dry)
bounce(out)
```